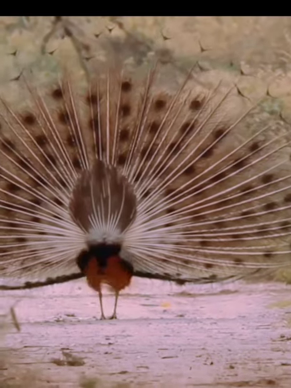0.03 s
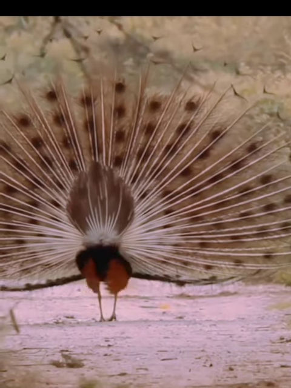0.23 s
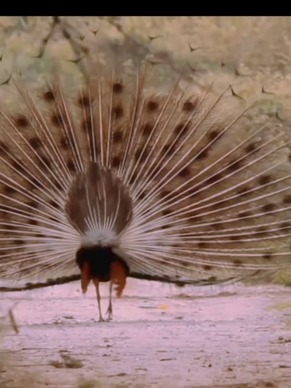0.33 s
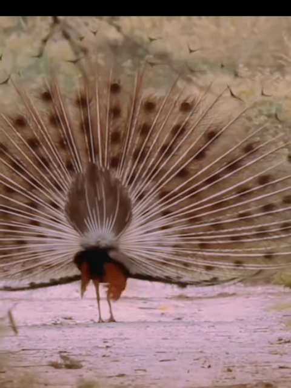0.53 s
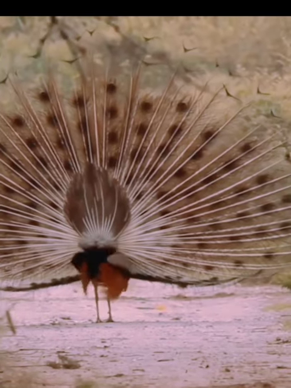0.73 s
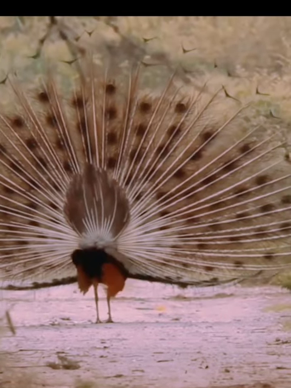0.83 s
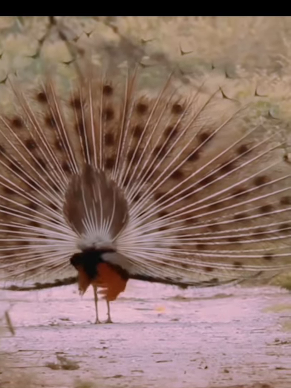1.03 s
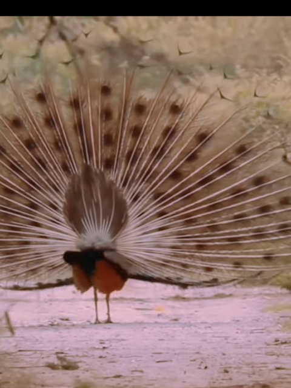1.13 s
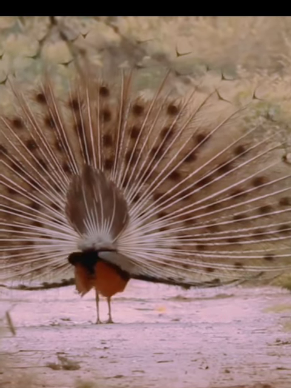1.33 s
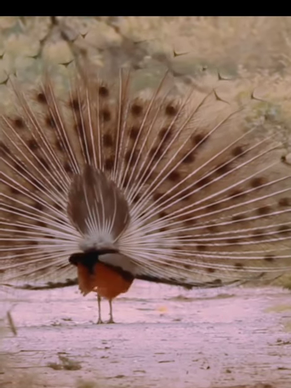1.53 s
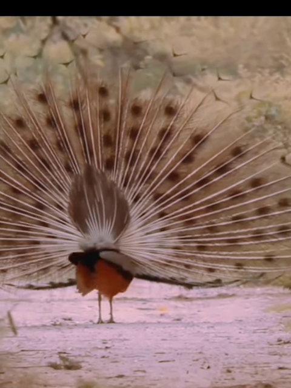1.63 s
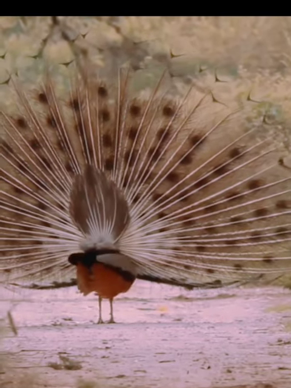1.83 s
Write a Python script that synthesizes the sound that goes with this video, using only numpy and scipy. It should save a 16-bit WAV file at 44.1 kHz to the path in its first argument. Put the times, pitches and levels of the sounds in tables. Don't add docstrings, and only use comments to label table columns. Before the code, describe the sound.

Single piercing peacock honk, rising quickly then sagging, with a short echo over quiet open-air rumble.

```python
import sys
import numpy as np
from scipy import signal
from scipy.fft import rfft, irfft
from scipy.io import wavfile
from scipy.ndimage import uniform_filter1d

SR = 44100
rng = np.random.default_rng(int(sys.argv[2]) if len(sys.argv) > 2 else 0)


def master_out(mix):
    frames = np.transpose(np.atleast_2d(mix))
    ceiling = np.clip(frames, -1, 1)
    pcm = np.round(ceiling * 32767).astype(np.int16)
    wavfile.write(sys.argv[1], SR, pcm)


def rack_gain(trim_db):
    fader = np.asarray(trim_db, float)
    return 10 ** (fader / 20)


N = 83790

# frequency [hz], density_db [dB per Hz]
AIR_SPECTRUM = [(24, -40), (40, -8.5), (108, -1), (443, -15.5), (582, -17.5), (1290, -26.5), (1420, -27.5),
                (3390, -31.5), (15000, -60.5)]
# start_s [s], length_s [s], first_hz [Hz], middle_hz [Hz], last_hz [Hz]
BIRD_CALLS = [(.015, .03, 5400, 5350, 5200), (.04, .022, 7100, 7100, 7050), (.075, .03, 7100, 7100, 7050),
              (.086, .035, 4300, 4600, 4200), (.122, .03, 4200, 3900, 3950), (.14, .04, 3750, 3500, 3350),
              (1.423, .04, 2950, 3450, 2850), (1.646, .034, 4850, 4950, 5150),
              (1.635, .015, 3700, 4000, 4700), (1.663, .05, 4500, 3750, 3550),
              (1.692, .03, 4800, 5300, 4850), (1.716, .034, 3750, 4700, 3800),
              (1.724, .03, 2850, 3100, 2850), (1.748, .025, 2950, 3050, 2900),
              (1.79, .035, 3700, 4400, 4650), (1.735, .014, 9400, 9400, 9300),
              (1.885, .015, 7500, 7500, 7450)]
# time_s [s], pitch_hz [Hz]
HONK_PITCH = [
    (.237, 554.1),
    (.275, 623.0),
    (.301, 647.3),
    (.342, 661.1),
    (.4, 662.8),
    (.6, 626.4),
    (.684, 601.7),
    (.74, 570.9),
    (.78, 520),
]
# time_s [s], level_db [dB], overtone_slope_db [dB per octave], beak_opening [0-1],
# hoarseness_db [dB]
HONK_EFFORT = [
    (.226, -23, -3.0, 0.7, -15),
    (.234, -6.5, -2.36, 0.36, -19.5),
    (.29, -4.5, 1.38, .25, -13.5),
    (.34, -2, 1.63, 0.72, -18),
    (.47, -1.5, 0.04, 0.8, -25),
    (.6, -2.5, -1.5, 0.48, -30),
    (.72, -7, 1.5, 0.56, -30),
    (.762, -9, -0.65, 0.56, -30),
    (.778, -40, 1, 0.3, -15),
]
# overtone_number [1], level_db [dB]
MEMBRANE_PULSE = [(1, -2.14), (3, 6.5), (4, 3.5), (5, 2.05), (6, -1.5), (7, -7.5), (8, -0.6), (9, 0),
                  (10, 4.6), (12, -2.3), (27, -14.2)]
# centre_hz [Hz], width_hz [Hz], shut_beak_db [dB], open_beak_gain_db [dB]
THROAT_RESONANCES = [(703, 93, -14, 7), (1297.7, 272, 1.1, -4.15), (1610, 150, -42, -29),
                     (2520, 540, -10.5, -10.5), (2973, 260, -14, -4.5), (4180, 330, -12, 4.5),
                     (5210, 630, -33.5, 27), (6404, 180, -24, -1.5), (7560, 200, -26.5, -5.5),
                     (8470, 1050, -18.5, -14), (9840, 1100, -60, -19), (10370, 700, -40, 15),
                     (11300, 2700, -35, 3), (13300, 2200, -34, -12)]
# centre_hz [Hz], width_hz [Hz], share_removed [0-1]
THROAT_POCKETS = [(1924, 142, .85), (2547, 600, 0.84), (3765, 440, 1), (4800, 420, 0.89), (5830, 540, 0.63)]
# frequency_hz [Hz], left_minus_right_db [dB]
MICROPHONE_TILT = [(60, -3.5), (130, 1.0), (290, 3), (640, 5), (1400, 5.0), (3080, 2), (6760, 1),
                   (14900, 2.5)]

TIME_S = np.arange(N) / SR
OPPOSED = np.array([[1], [-1]])


def in_time(rows):
    time_s, *columns = np.transpose(rows)
    return [np.interp(TIME_S, time_s, column) for column in columns]


def at_hz(points, hz):
    table_hz, table_db = np.transpose(points)
    return np.interp(np.log(hz), np.log(table_hz), table_db)


def rms_one(x):
    return x / np.sqrt(np.mean(x ** 2) + 1e-20)


def drift(rate_hz):
    r = np.exp(-2 * np.pi * rate_hz / SR)
    slow = signal.lfilter([1], [1, -2 * r, r * r], rng.standard_normal(N + SR))
    return rms_one(slow[SR:])


def resonance(x, hz, width_hz):
    r = np.exp(-np.pi * width_hz / SR)
    zeros = np.array([1, 0, -1]) * (1 - r * r) / 2
    return signal.lfilter(zeros, [1, -2 * r * np.cos(2 * np.pi * hz / SR), r * r], x)


def delayed(x, delay_s):
    return np.interp(np.arange(N) - delay_s * SR, np.arange(N), x)


def scatter(x, t60_s, cut_hz, start_s):
    decay = rack_gain(-60 * TIME_S / t60_s) * np.clip(TIME_S / start_s - 1, 0, 1)
    mid, side = rng.standard_normal((2, N)) * decay
    tail = signal.lfilter(*signal.butter(1, cut_hz, fs=SR), mid + 0.17 * side * OPPOSED)
    tail = tail / np.sqrt(np.sum(tail[0] ** 2))
    return irfft(rfft(tail, 2 * N) * rfft(x, 2 * N))[:, :N]


def air():
    level_db, side_db, patchy_db, rumble_cut_hz = -32.5, -17.5, -1, 34
    out, white = 0, rng.standard_normal((2, 2, N + SR))
    edges_hz = 22 * 2 ** np.arange(0, 10, .5)
    for k, (low, high) in enumerate(zip(edges_hz, edges_hz[1:])):
        band = signal.butter(2, [low, high], "band", fs=SR, output="sos")
        mid, side = signal.sosfilt(band, white[k % 2])[:, SR:]
        gain = rack_gain(at_hz(AIR_SPECTRUM, np.sqrt(low * high)) + patchy_db * drift(2.4))
        out = out + gain * (mid + rack_gain(side_db) * side * OPPOSED)
    high_pass = signal.butter(2, rumble_cut_hz, "high", fs=SR, output="sos")
    return signal.sosfilt(high_pass, rack_gain(level_db) * rms_one(out))


def engine():
    drone = resonance(rng.standard_normal(N + SR), 118.3, 11)[SR:]
    return rack_gain(-43) * rms_one(drone)


def birds():
    level_db, nearing_db_per_s, tilt_db, flutter_db = -49, 4.5, -8, 2.5
    out = np.zeros(N + SR)
    for start_s, length_s, first_hz, middle_hz, last_hz in BIRD_CALLS:
        u = np.linspace(-1, 1, int(length_s * SR))
        hz = middle_hz + u * (last_hz - first_hz) / 2 + u * u * ((first_hz + last_hz) / 2 - middle_hz)
        remote = abs(np.log2(middle_hz / 4800)) / 2 + max(np.log2(middle_hz / 5500), 0)
        gain = rack_gain(level_db + nearing_db_per_s * start_s + tilt_db * remote) * np.sqrt(1 - u ** 4)
        start = int(start_s * SR)
        out[start:start + len(u)] += gain * np.sin(2 * np.pi * np.cumsum(hz) / SR)
    return out[:N] * rack_gain(flutter_db * drift(42))


def bird_echoes(chirps):
    return rack_gain(-7) * scatter(resonance(chirps, 3100, 4000), .3, 5200, 0.0033)


def flock():
    centre_hz, width_hz, spread_s = 4970, 1650, 0.15
    swell = 0
    for peak_s, level_db in ((0.12, -50.5), (1.698, -49.5)):
        swell = swell + rack_gain(level_db) * np.exp(-((TIME_S - peak_s) / spread_s) ** 2)
    blur = resonance(rng.standard_normal(N), centre_hz, width_hz)
    return swell * rms_one(resonance(blur, centre_hz, width_hz))


def honk():
    waver, patchy_db, patch_hz = .0003, 1.6, 9
    hz = uniform_filter1d(in_time(HONK_PITCH)[0], size=800) * (1 + waver * drift(25))
    level_db, slope_db, opening, hoarse_db = in_time(HONK_EFFORT)
    phase = 2 * np.pi * np.cumsum(hz) / SR
    pulses = 0
    for k in range(1, 28):
        overtone_db = np.interp(k, *np.transpose(MEMBRANE_PULSE)) + np.log2(max(k, 2) / 2) * slope_db
        overtone_db = overtone_db + np.log2(max(k, 8) / 8) * 2 * patchy_db * drift(patch_hz)
        pulses = pulses + rack_gain(overtone_db) * np.cos(k * phase)
    hiss = rng.standard_normal(N) * (1 + np.cos(phase))
    sounding = level_db > level_db[0]
    source = rack_gain(level_db) * sounding * (np.sqrt(2) * pulses + 4 * rack_gain(hoarse_db) * hiss)
    out = 0
    for centre_hz, width_hz, shut_db, open_db in THROAT_RESONANCES:
        formant = resonance(resonance(source, centre_hz, width_hz), centre_hz, width_hz)
        out = out + rack_gain(shut_db + open_db * opening) * formant
    return out


def pockets(x):
    for hz, width_hz, share in THROAT_POCKETS:
        x = x - np.clip(share, 0, 1) * resonance(x, hz, width_hz)
    return x


def ground_echo(call):
    return rack_gain(-10) * signal.lfilter([1, -1], [1, -.6], delayed(call, .0039))


def wall_echo(call):
    turn_db, turn_from_s, turn_s = 13, 0.52, .16
    turn_back_s, turn_back_db_per_s = .66, 55
    facing_db = turn_db * np.clip((TIME_S - turn_from_s) / turn_s, 0, 1)
    facing_db = facing_db - turn_back_db_per_s * np.maximum(TIME_S - turn_back_s, 0)
    late = delayed(call * rack_gain(facing_db), .04)
    return rack_gain(-12) * resonance(late, 1260, 100) + rack_gain(-25.5) * late


def tree_echoes(call):
    near = rack_gain(-18.5) * scatter(call, 0.53, 4000, 0.04)
    far = rack_gain(-35) * scatter(call, 1.9, 1800, 0.09)
    return near + far


def scene():
    chirps = birds()
    call = pockets(honk())
    background = air() + engine() + flock() + chirps + bird_echoes(chirps)
    return background + call + ground_echo(call) + wall_echo(call) + tree_echoes(call)


def low_pass(x):
    return signal.sosfilt(signal.butter(12, 15460, fs=SR, output="sos"), x)


def record(dry):
    duck_from_db, duck_share, attack_s, recover_db_per_s = -21.5, 0.49, 0.0075, 2.5
    tilt_db = at_hz(MICROPHONE_TILT, np.maximum(np.fft.rfftfreq(N, 1 / SR), 1)) / 2
    x = irfft(rfft(dry) * rack_gain(tilt_db * OPPOSED), N)
    level_db = 10 * np.log10(uniform_filter1d(np.mean(x ** 2, axis=0), size=400) + 1e-12)
    ramp_db = recover_db_per_s * TIME_S
    wanted_db = duck_share * np.maximum(level_db - duck_from_db, 0)
    duck_db = np.maximum.accumulate(wanted_db + ramp_db) - ramp_db
    r = np.exp(-1 / (attack_s * SR))
    x = x * rack_gain(-signal.lfilter([1 - r], [1, -r], duck_db))
    x = 2.5 * np.tanh(x / 2.5)
    x = signal.sosfilt(signal.cheby2(12, 70, 15900, fs=SR, output="sos"), x)
    return low_pass(x)


dry = scene()
out = record(dry)
master_out(out)
```